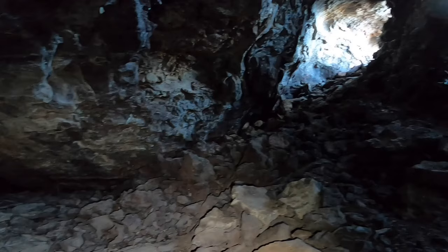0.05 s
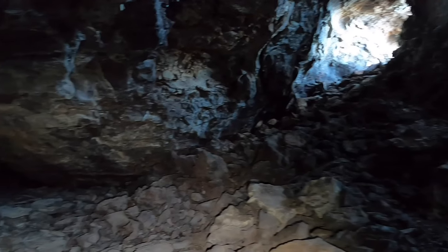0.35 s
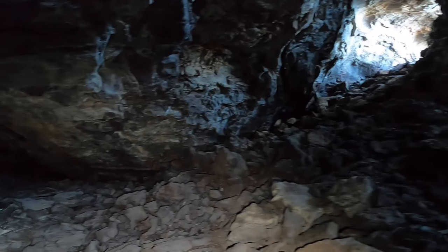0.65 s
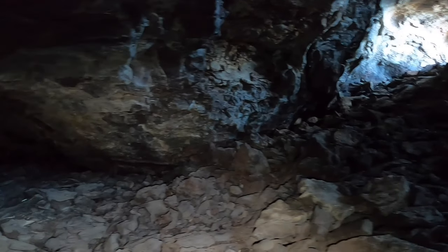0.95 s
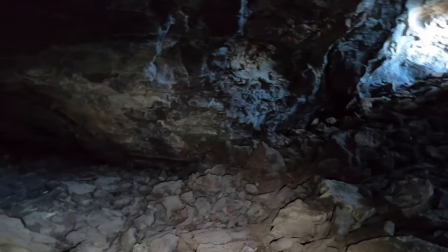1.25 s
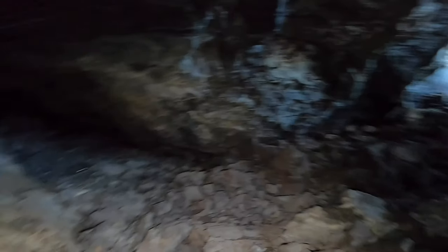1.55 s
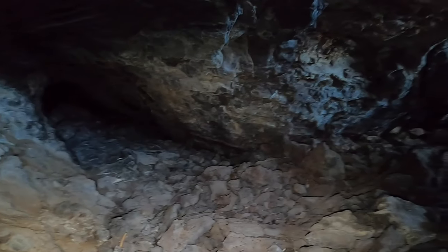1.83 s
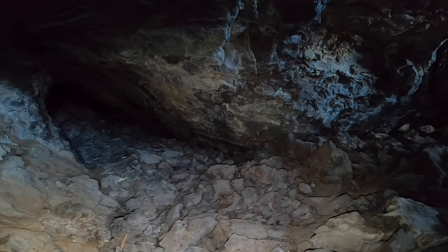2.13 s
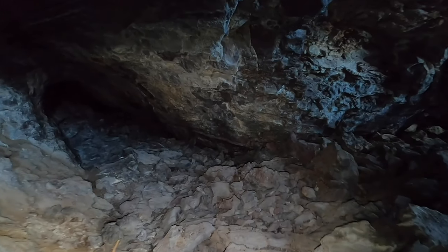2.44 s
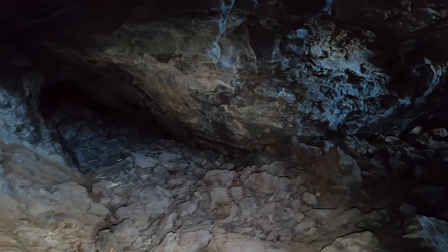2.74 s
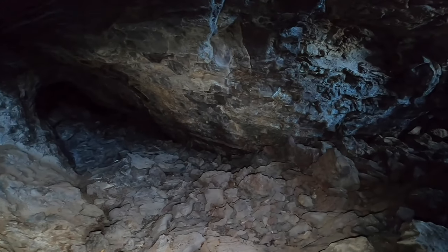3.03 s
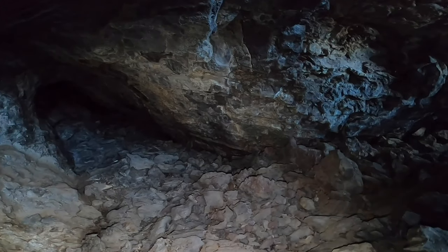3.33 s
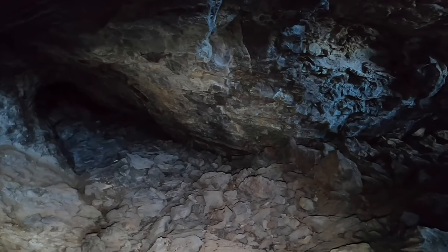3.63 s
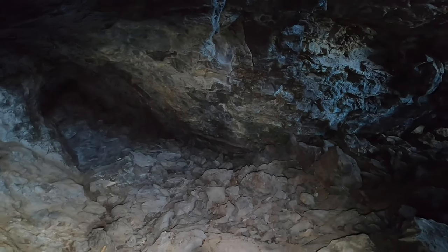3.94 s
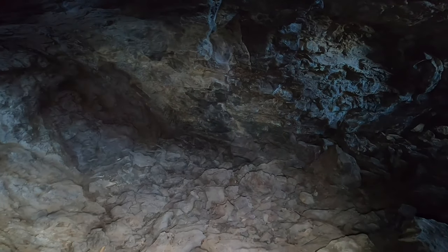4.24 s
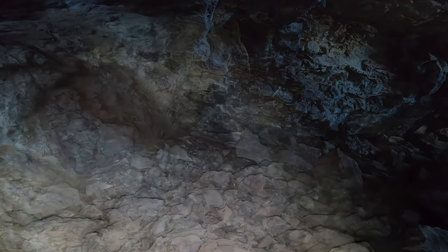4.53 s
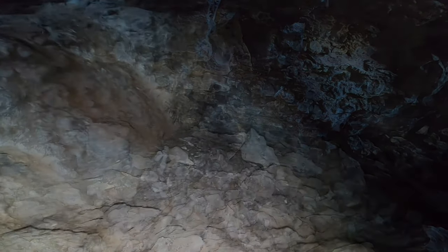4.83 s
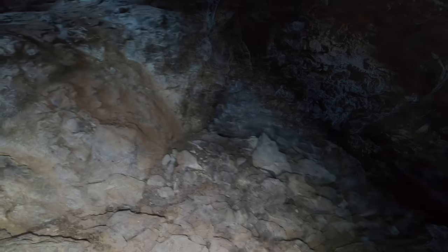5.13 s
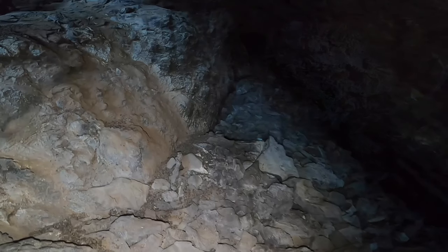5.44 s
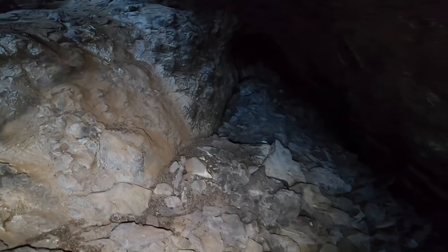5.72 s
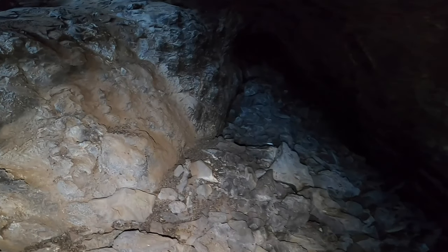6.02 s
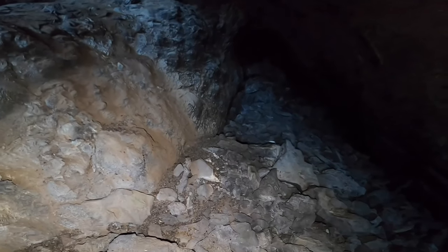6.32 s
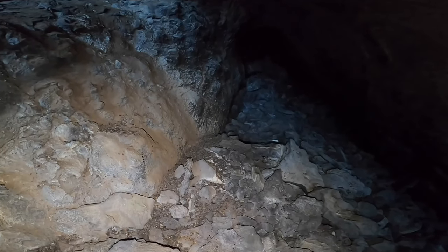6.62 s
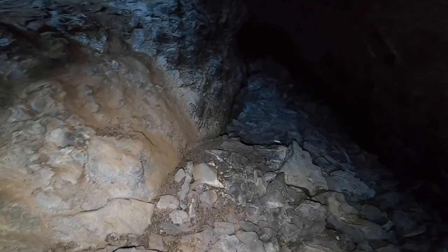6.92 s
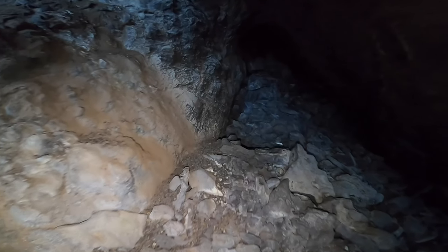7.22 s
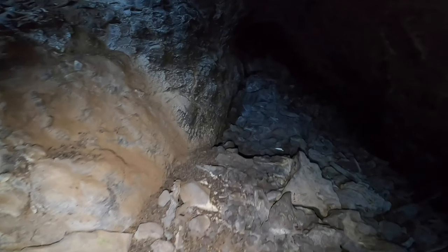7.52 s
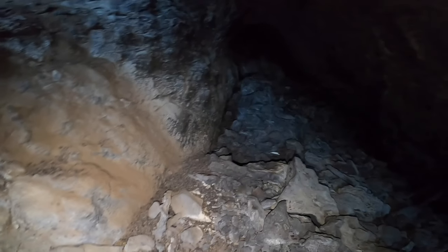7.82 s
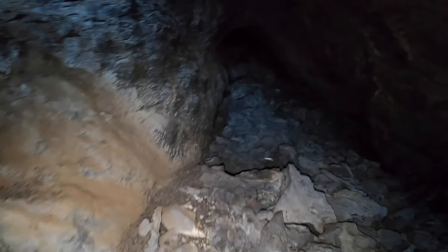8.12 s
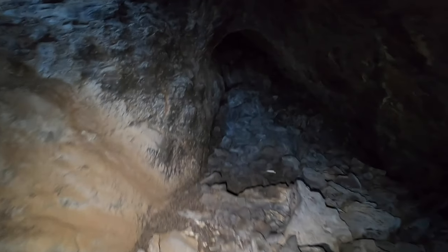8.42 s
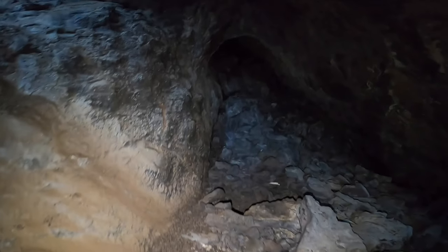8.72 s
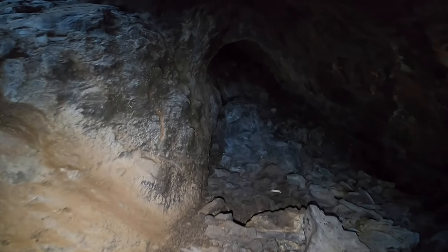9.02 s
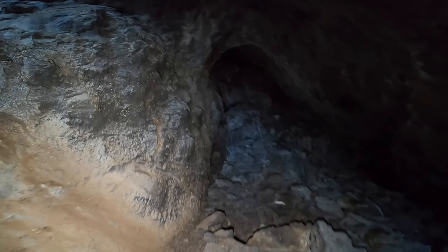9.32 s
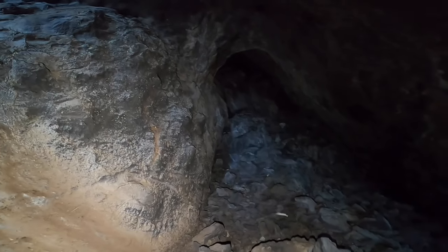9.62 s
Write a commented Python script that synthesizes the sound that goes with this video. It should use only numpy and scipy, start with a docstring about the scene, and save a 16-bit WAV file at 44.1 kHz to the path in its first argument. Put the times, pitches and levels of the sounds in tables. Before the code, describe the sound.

Uneven footsteps crunch over loose rock in a quiet cave, with stones knocking, scraping and clinking over a faint hiss.

```python
"""First comes a low murmur of air with a faint hiss, then footsteps on loose lava rubble in a low tunnel.
Someone is picking a way along. Each step packs the stones with a dull rumble, grinds the grit in
many tiny slips and knocks single stones together. Now and then a sliver of stone clinks,
or something hard drags over the rock and rings. The close rock walls add a short echo."""
import sys
import numpy as np
from scipy import signal
from scipy.fft import rfft, irfft, next_fast_len
from scipy.io import wavfile
from scipy.ndimage import uniform_filter1d, map_coordinates

SR = 44100
rng = np.random.default_rng(int(sys.argv[2]) if len(sys.argv) > 2 else 0)


def put_to_file(sound):
    """Save the sound as 16-bit audio at rate SR, in the file named by the first command-line argument."""
    columns = np.atleast_2d(sound).T  # one column per channel
    safe = np.clip(columns, -1, 1)
    whole_steps = np.round(safe * 32767)
    wavfile.write(sys.argv[1], SR, whole_steps.astype(np.int16))


N = 434826
TIME = np.arange(N) / SR


def from_db(db):
    """Turns decibels into a number to multiply a sound by."""
    return 10 ** (np.asarray(db) / 20)


def rms_one(x):
    """Scales a sound so that its average strength (rms) is 1."""
    return x / np.sqrt(np.mean(x ** 2) + 1e-20)


def at_hz(points, hz):
    """Reads a table between its rows, giving every octave equal room."""
    hz_points, values = np.transpose(points)
    return np.interp(np.log(np.maximum(hz, 1)), np.log(hz_points), values)


def band(x, low_hz, high_hz):
    """Keeps the part of a sound between two frequencies."""
    edges = np.clip([low_hz, high_hz], 10, .47 * SR)
    return signal.sosfilt(signal.butter(2, edges, "band", fs=SR, output="sos"), x + 1e-18)


def resonate(x, hz, width_hz):
    """Makes a sound ring at one pitch; the narrower the width, the longer it rings."""
    r = np.exp(-np.pi * width_hz / SR)
    feedback = [1, -2 * r * np.cos(2 * np.pi * hz / SR), r * r]
    return signal.lfilter(np.array([1, 0, -1]) * (1 - r * r) / 2, feedback, x + 1e-18)


def evened(x, seconds):
    """Holds the strength near 1, leaving only flickers quicker than the given time."""
    size = max(int(seconds * SR), 8)
    power = np.mean(np.atleast_2d(x) ** 2, axis=0)
    power = uniform_filter1d(uniform_filter1d(power, size), size)
    return x / np.sqrt(np.maximum(power, 0) + 1e-6 * power.mean())


def drift(per_s):
    """A smooth random wander of strength 1."""
    turns = rng.standard_normal(int(per_s * TIME[-1]) + 2)
    return rms_one(np.interp(TIME * per_s, np.arange(len(turns)), turns))


def swell(s, hold_s, rise_s, fall_s):
    """Pressure builds up to 1 at time s, is held, and dies away."""
    out = np.zeros(N)
    near = slice(max(int((s - 8 * rise_s) * SR), 0), int((s + hold_s + 8 * fall_s) * SR))
    t = TIME[near] - s
    out[near] = np.exp(np.minimum(t, 0) / rise_s - np.maximum(t - hold_s, 0) / fall_s)
    return out


def slips(per_s, spread_db):
    """Tiny cracks and slips as random clicks: many weak, a few strong."""
    at = np.flatnonzero(rng.random(N) < per_s / SR)
    clicks = np.zeros(N)
    clicks[at] = from_db(spread_db * np.minimum(rng.exponential(1, N)[at], 5))
    return clicks


def add(track, s, sound):
    """Mixes a sound into the track at time s."""
    start = int(round(s * SR))
    track[..., start:start + sound.shape[-1]] += sound[..., :N - start]


# How alike left and right are: (frequency [Hz], likeness [0 to 1])
LIKENESS = [(500, 0.98), (2000, 0.9), (5000, 0.72), (12000, 0.4)]


def stereo(mid, side, hz, diffuse=0):
    """Left and right are less alike for high sounds and for sound from all around (diffuse)."""
    alike = np.clip(at_hz(LIKENESS, hz) * (1 - diffuse), 0, .995)
    return np.sqrt((1 + alike) / 2) * mid + np.sqrt((1 - alike) / 2) * side * np.array([[1], [-1]])


# The tone of the air's murmur and of its hiss: (frequency [Hz], relative level [dB])
MURMUR_TONE = [(25, -8.5), (100, -21.5), (165, -1.5), (250, -2.5), (400, -11), (900, -21), (4000, -55)]
HISS_TONE = [(300, -23.5), (700, -7.5), (1300, 0.5), (3800, -6.5), (7300, -10.5), (12000, -27.5),
             (16000, -36)]
# The slow rise and fall of the hiss: (time [s], level [dB])
HISS_LEVEL = [(0, -72), (1.48, -68), (1.59, -64), (1.72, -73), (2.2, -65.5), (4.35, -70.5), (4.68, -65),
              (5.13, -71), (7.0, -66), (7.15, -60), (7.5, -64.5), (8.78, -68.5), (9.86, -74)]


def air(murmur_db=-67, diffuse=0.67, waver_db=1.1, wavers_per_s=7, rustle_db=2.0):
    """The still tunnel: a wavering low murmur under a thin, slowly changing hiss."""
    hz = np.fft.rfftfreq(N, 1 / SR)
    wavering_db = murmur_db + waver_db * drift(wavers_per_s)
    hiss_db = np.interp(TIME, *np.transpose(HISS_LEVEL)) + rustle_db * drift(wavers_per_s)
    out = 0
    for tone, level_db in (MURMUR_TONE, wavering_db), (HISS_TONE, hiss_db):
        white = rfft(rng.standard_normal((2, N)))
        spectrum = stereo(*white, hz, diffuse) * from_db(at_hz(tone, hz))
        out = out + from_db(level_db) * rms_one(irfft(spectrum, N))
    return out


# How long the tunnel echoes: (frequency [Hz], time to fade by 60 dB [s])
ECHO_FADE = [(100, 0.51), (260, 0.25), (800, 0.1), (8000, 0.18)]


def tunnel(x, echo_db=-12, first_echo_s=0.0033, diffuse=0.26):
    """Close, rough walls send back a short blur of echoes, different on each side."""
    t, edges = np.arange(SR // 2) / SR, np.geomspace(60, 16000, 9)
    tail = 0
    for low, high in zip(edges, edges[1:]):
        hz = np.sqrt(low * high)
        noise = band(stereo(*rng.standard_normal((2, len(t))), hz, diffuse), low, high)
        tail = tail + noise * from_db(-60 * t / at_hz(ECHO_FADE, hz))
    tail = tail * (t > first_echo_s)
    tail = tail / np.sqrt(np.sum(tail ** 2) / 2)
    return x + from_db(echo_db) * signal.fftconvolve(x, tail, axes=1)[:, :N]


# How much louder the left side is: (frequency [Hz], left minus right [dB])
LEFT_LOUDER = [(100, -0.2), (600, 1.5), (1300, 2.5), (2400, 5.5), (4400, 3), (8000, -1), (15000, 1)]
# How far the left wave runs ahead: (frequency [Hz], lead [radians])
LEFT_AHEAD = [(100, 0.077), (1300, -0.26), (2760, -0.45), (5300, 0.25), (7600, 0.93)]


def microphone_openings(x):
    """Sound from the ground reaches the microphone's two openings with unequal level and timing."""
    size = next_fast_len(N + 2000)
    hz = np.fft.rfftfreq(size, 1 / SR)
    left = from_db(at_hz(LEFT_LOUDER, hz) / 2) * np.exp(.5j * at_hz(LEFT_AHEAD, hz))
    return irfft(rfft(x, size) * np.array([left, 1 / left]), size)[:, :N]


# Hard edges dragged over rock. Each row is one edge, with two lists:
# strokes (time [s], hold [s], level [dB]) and tones (pitch [Hz], width [Hz], relative level [dB])
DRAGS = [ ([(2.349, 0.009, -28.5), (2.413, 0.0038, -46)], [(5660, 170, -1), (5867, 34, -6.5),
         (8847, 190, -20)]), ([(2.66, 0.081, -56.5), (2.792, 0.025, -41.5), (2.93, 0.018, -43),
         (2.98, 0.071, -50.5), (3.06, 0.035, -31.5), (3.212, 0.0081, -44.5)], [(2590, 280, 5.5),
         (5910, 180, -2), (8680, 260, -13), (12000, 200, -25)]), ([(5.83, 0.098, -68), (7.3, 0.077, -57.5),
         (7.62, 0.18, -66.5), (7.91, 0.046, -63), (8.17, 0.014, -53.5)], [(4140, 150, 2.5),
         (5228, 96.3, 3.5), (6738, 87, -5), (8720, 160, -7)]), ([(9.25, 0.12, -50)], [(1080, 82, 0.5),
         (2724, 57, 0), (3065, 60, 1), (5600, 97, -12), (6760, 100, -12), (8800, 200, -15.5)])]


def drags(slips_per_s=450, catches_per_s=160, catch_db=3, sag=0.03, wander=0.012, wanders_per_s=60,
          rise_s=0.0042, fall_s=0.0093):
    """An edge sticks and slips, ringing a few tones unevenly; the pitch wanders and sags when pressed."""
    out, clicks = 0, slips(slips_per_s, spread_db=10.5) * rng.choice([-1, 1], N)
    for strokes, tones in DRAGS:
        ringing = 0
        for hz, width_hz, db in tones:
            tone = resonate(resonate(clicks, hz, width_hz), hz, 4 * width_hz)
            catching = from_db(catch_db * drift(catches_per_s))
            ringing = ringing + from_db(db) * rms_one(tone * catching)
        pressure = sum(from_db(db) * swell(s, hold_s, rise_s, fall_s) for s, hold_s, db in strokes)
        speed = 1 + wander * drift(wanders_per_s) - sag * np.tanh(pressure / from_db(-32.5))
        bent = map_coordinates(evened(ringing, 0.013), [np.cumsum(speed)], order=2, mode="mirror")
        out = out + pressure * bent
    return out


# Dense slivers of stone landing: (time [s], level [dB], pitch [Hz])
CLINKS = [(0.482, -40.5, 3300), (0.773, -47, 3270), (0.883, -37.5, 3214), (2.567, -45, 7100),
          (4.59, -42, 5280), (5.788, -35, 3967), (6.86, -49, 984), (7.289, -29.5, 1845),
          (8.306, -35.5, 7200), (8.389, -37, 5187), (9.017, -48.5, 7090), (9.055, -42.5, 5210),
          (9.156, -41, 7150)]
# A sliver's higher tones: (multiple of its pitch [ratio], relative level [dB])
SLIVER_TONES = [(1.19, -15), (1.71, -14.5), (2.34, -14.5)]


def clinks(cycles=22, contact_s=0.0013, contact_db=-3, bounce_s=0.0078, bounce_db=-6):
    """A sliver lands with a gritty tick, bounces once and rings briefly; high tones die first."""
    out, t = np.zeros((2, N)), np.arange(SR // 12) / SR
    for s, db, hz in CLINKS:
        tones = [(hz, 0)] + [(hz * ratio, level) for ratio, level in SLIVER_TONES if hz * ratio < SR / 5]
        for delay_s, loss_db in (0, 0), (bounce_s, bounce_db):
            noise = stereo(*rng.standard_normal((2, len(t))), hz)
            tick = band(noise, hz / 2, hz * np.sqrt(2)) * np.exp(-t / contact_s)
            ring = 0
            for tone_hz, tone_db in tones:
                strength = from_db(tone_db + 2 * rng.standard_normal())
                ring = ring + strength * np.sin(2 * np.pi * tone_hz * t) * np.exp(-t * tone_hz / cycles)
            add(out, s + delay_s, from_db(db + loss_db) * (ring + from_db(contact_db) * tick))
    return out


# The sole coming down: (time [s], relative boom level [dB], relative deep level [dB], slab pitch [Hz])
THUDS = [(0.5, -41, -65.5, 205), (0.824, -33, -43.5, 195), (2.335, -33.5, -56, 128),
         (3.097, -39, -56.5, 215), (3.452, -32, -57, 159), (3.57, -34.5, -70, 169),
         (4.783, -33, -53.5, 259.8), (6.462, -30, -68, 177), (6.529, -31, -55, 232),
         (6.743, -33, -52, 194.3), (7.281, -33, -48.5, 294), (7.327, -42, -50, 170.4),
         (8.062, -39.5, -71, 210.6), (8.103, -36.5, -61, 199.5), (8.621, -33, -53.5, 182),
         (9.656, -43.5, -79, 196)]


def thuds(rise_s=0.0037, fall_s=0.011, boom_s=0.012):
    """The soft sole pushes packed rubble: a slab booms, and under full weight the ground swings deeper."""
    out, t = np.zeros(N), np.arange(SR // 5) / SR
    rise = 1 - np.exp(-t / rise_s)
    for s, boom_db, deep_db, hz in THUDS:
        push = rise * np.exp(-t / fall_s) * rng.standard_normal(len(t))
        bump = band(push, hz, 2 * hz)
        boom = rise * np.exp(-t / boom_s) * np.sin(2 * np.pi * hz * t)
        slab = boom / boom.max() + bump / np.abs(bump).max()
        ground = rms_one(band(push, 53, 134))
        add(out, s, from_db(boom_db - 3) * slab + from_db(deep_db - 7) * ground)
    return out


# Single stones knocking: (time [s], relative clack level [dB], relative tick level [dB], pitch [Hz])
KNOCKS = [(0.481, -41, -58, 1280), (0.605, -47.5, -52, 2200), (0.628, -52, -49.5, 2420),
          (0.701, -43.5, -52.5, 2680), (0.825, -42, -42.5, 985), (1.202, -51, -80, 1095),
          (2.347, -27.5, -40, 1750), (2.407, -33.5, -48, 1986), (2.573, -45, -45.5, 2900),
          (2.792, -41.5, -34, 5900), (2.815, -34, -43.5, 1710), (2.826, -39.5, -50, 1750),
          (2.899, -50.5, -47, 5400), (2.918, -38.5, -40.5, 2900), (3.088, -23, -41, 1580),
          (3.196, -42, -54, 2640), (3.214, -32.5, -52, 1617), (3.425, -42.5, -50.5, 1780),
          (3.547, -38, -47, 1820), (4.067, -47.5, -69, 1599), (4.119, -47.5, -77, 1315),
          (4.336, -54, -62, 2840), (4.549, -43.5, -57, 1580), (4.588, -35.5, -51, 1109),
          (4.764, -45, -34.5, 3755), (4.844, -35.5, -42, 3150), (4.881, -54, -65, 1478),
          (4.934, -45.5, -65, 1880), (5.035, -51, -77, 1284), (5.789, -41, -44, 3770),
          (5.846, -39.5, -52, 1597), (6.149, -34, -48.5, 1582), (6.166, -37.5, -50, 1550),
          (6.185, -41, -50.5, 1440), (6.219, -42.5, -51.5, 2900), (6.372, -46, -57, 2154),
          (6.402, -39.5, -50, 2406), (6.444, -23, -48, 1145), (6.452, -25.5, -46, 1370),
          (6.474, -36, -42.5, 912), (6.492, -33, -39, 3060), (6.643, -41, -60, 1670),
          (6.705, -36.5, -55.5, 1300), (6.737, -29.5, -48.5, 1640), (6.744, -22.5, -42.5, 1800),
          (7.219, -39, -49, 3290), (7.24, -32.5, -61, 1064), (7.287, -30.5, -69, 1202),
          (7.328, -31.5, -63, 1780), (7.488, -56, -61, 4500), (8.292, -38.5, -63, 1290),
          (8.306, -40.5, -48, 1640), (8.536, -43.5, -53, 1630), (8.608, -50, -47, 5310),
          (8.621, -43.5, -81, 1740), (8.843, -56, -72, 1560), (9.125, -35.5, -51, 1210),
          (9.208, -54, -52.5, 5032), (9.221, -54, -47, 5076), (9.245, -35.5, -57, 1200),
          (9.302, -47, -49, 2900), (9.367, -39, -74, 1056), (9.428, -55, -58, 5140),
          (9.563, -53, -62.5, 3898)]


def knocks(contact_s=0.0026, rattle_s=0.025, rattle_db=-19, sharpness=8, ring_db=12, body_db=-8):
    """A sharp hit rattles the stones nearby; the struck stone, full of holes, rings only briefly."""
    out, t = np.zeros((2, N)), np.arange(SR // 20) / SR
    fade = np.exp(-t / contact_s) + from_db(rattle_db) * np.exp(-t / rattle_s)
    ranges_hz = [(330, 700), (950, 2180), (3500, 7250)]   # body, clack, tick
    for s, clack_db, tick_db, stone_hz in KNOCKS:
        hit = fade * stereo(*rng.standard_normal((2, len(t))), stone_hz)
        hit = hit + from_db(ring_db) * resonate(hit, stone_hz, stone_hz / sharpness)
        big_db = body_db - 10 * np.log10(stone_hz / 2000)   # big, low-pitched stones have more body
        for level_db, (low, high) in zip((clack_db + big_db, clack_db, tick_db), ranges_hz):
            part = band(band(hit, low, high), low / 2, 2 * high)
            add(out, s, from_db(level_db - 11.5) * rms_one(part))
    return out


# A foot bearing down: (time [s], hold [s], heavy stones [dB], gravel [dB], fine grit [dB])
PRESSES = [(0.489, 0.0058, -48.5, -49, -66), (0.779, 0.14, -48.5, -49, -60), (0.826, 0.0099, -34, -44, -49),
           (2.305, 0.021, -41.5, -38, -45.5), (2.342, 0.02, -37, -33.5, -60),
           (2.575, 0.0044, -45.5, -50, -56.5), (2.784, 0.022, -51, -42.5, -46.5),
           (3.031, 0.019, -55, -42.5, -50), (3.062, 0.047, -36.5, -31, -43.5),
           (3.217, 0.0088, -48, -43.5, -61.5), (3.434, 0.045, -49.5, -53.5, -66),
           (3.565, 0.019, -45, -47, -63), (4.164, 0.013, -44, -48.5, -77), (4.76, 0.021, -38.5, -35, -41),
           (4.845, 0.051, -49.5, -50, -63.5), (5.569, 0.042, -53, -55, -65),
           (6.054, 0.027, -51.5, -54, -62), (6.15, 0.07, -50, -48.5, -51),
           (6.447, 0.0097, -39.5, -35.5, -45), (6.528, 0.019, -45.5, -44.5, -48),
           (6.643, 0.027, -45.5, -48.5, -54.5), (6.855, 0.034, -48.5, -58.5, -71),
           (7.291, 0.0083, -30.5, -41, -66), (7.33, 0.0057, -35, -41, -53), (8.065, 0.014, -46, -53, -52.5),
           (8.29, 0.015, -39, -46, -50.5), (8.351, 0.018, -53.5, -52.5, -51.5),
           (8.621, 0.0072, -47, -50, -80), (9.126, 0.0058, -42, -47.5, -51),
           (9.249, 0.13, -47.5, -58.5, -65)]
# The sole rubbing lightly as it seeks a hold: (time [s], length [s], gravel [dB], sandiness [dB])
SHUFFLES = [(0.459, 0.22, -62.5, 0), (1.14, 0.048, -65.5, -2.5), (2.40, 0.062, -55.5, -1.5),
            (2.65, 0.42, -62, 1), (3.261, 0.45, -62, 2), (3.698, 0.15, -61, -4.5), (4.038, 0.16, -65.5, -4),
            (4.898, 0.1, -59, -1.5), (5.526, 0.22, -64, 1), (5.793, .16, -56.5, 1),
            (6.228, .1, -53.5, -1.5), (6.681, .2, -60.5, -3.5), (7.63, 0.19, -65.5, -5),
            (8.38, 0.065, -59.5, 0.5), (8.539, 0.072, -58.5, -0.5), (9.097, 0.15, -61, -4)]


def tread(press_rise_s=0.009, settle_db=-21):
    """How strongly the feet stir the heavy stones, the gravel and the grit: three loudness curves."""
    power = np.zeros((3, N))
    lags_s, falls_s = (0.0015, 0, 0), (0.013, 0.013, 0.0063)   # heavy stones move and stop later
    for s, hold_s, *levels_db in PRESSES:
        # loose stones creep before a press and settle after it
        settling = from_db(settle_db) * swell(s, hold_s, rise_s=0.018, fall_s=0.055)
        for k, level_db in enumerate(levels_db):
            press = swell(s + lags_s[k], hold_s, press_rise_s, falls_s[k])
            power[k] += from_db(level_db) ** 2 * (press ** 2 + settling ** 2)
    for s, length_s, gravel_db, sandy_db in SHUFFLES:
        mix_db = np.array([-2 - sandy_db, 0, -5 + sandy_db])   # sandier: fewer heavy stones, more grit
        rub = swell(s, length_s, rise_s=0.024, fall_s=0.022)
        power += np.outer(from_db(gravel_db + mix_db), rub) ** 2
    return np.sqrt(power)


def chips(gravel, grit, per_s=170, cycles=19, level_db=-1, spread_db=3, snap_db=-57):
    """Small brittle chips snap underfoot, each ringing briefly at a pitch of its own."""
    out, t = np.zeros((2, N)), np.arange(SR // 25) / SR
    for when, pitch, strength, pan in rng.random((int(per_s * N / SR), 4)):
        at = int(when * N)
        hz = 1000 * 6 ** pitch
        push = gravel[at] ** (1 - pitch) * grit[at] ** pitch   # small, high chips follow the grit
        push = push * min(1, gravel[at] / from_db(snap_db))   # light pressure breaks hardly anything
        ring = np.sin(2 * np.pi * hz * t) * np.exp(-t * np.sqrt(hz * 1200) * np.pi / cycles)
        sides_db = level_db + spread_db * (2 * strength + pan * np.array([[1], [-1]]))
        add(out, at / SR, push * from_db(sides_db) * ring)
    return out


# The tone of the grinding rubble: (frequency [Hz], relative level [dB])
RUBBLE_TONE = [(65, -17), (100, -21.5), (170, -1.5), (410, -3.5), (650, -13.5), (1000, 7), (1650, 6),
               (2200, -9), (2700, 3), (3500, -16.5), (5700, -21), (8000, -28), (14000, -49)]


def grinding(clicks, low_hz, high_hz, count, sharpness, rub_db, even_s,
             spread_db=8, chatter_s=0.0037, coarser_db=3):
    """Each slip chatters briefly and rings some stone sizes more than others, over smooth rubbing."""
    out, at = 0, np.flatnonzero(clicks)
    noise = rng.standard_normal((2, N))
    fade = np.exp(-2 / (chatter_s * SR))
    for k, hz in enumerate(np.geomspace(low_hz, high_hz, count)):
        share = from_db(spread_db * np.clip(rng.standard_normal(len(at)), -2, 2))
        energy = np.zeros(N)
        energy[at] = (clicks[at] * share) ** 2
        chatter = signal.lfilter([1], [1, -fade], energy + 1e-18)
        own_noise = stereo(*np.roll(noise, k * SR // count, axis=1), hz)
        push = np.sqrt(chatter / chatter.mean() + from_db(rub_db) ** 2) * own_noise
        width_hz = hz / sharpness
        ring = resonate(resonate(push, hz, width_hz), hz, 2 * width_hz)
        # the rubble grows coarser and duller along the way
        tilt_db = coarser_db * (.5 - TIME / TIME[-1]) * np.log2(hz / low_hz)
        out = out + from_db(at_hz(RUBBLE_TONE, hz) + tilt_db) * ring
    return evened(out, even_s)


def crunch(heavy, gravel, grit):
    """More weight makes more slips a second; heavy stones, gravel and grit move together."""
    load = np.clip(gravel / from_db(-45), .05, 4) ** 0.51
    clicks = slips(560 * load, spread_db=4.5) * np.minimum(3.7 * load, 1)
    stones = heavy * grinding(clicks, 82.5, 674, count=9, sharpness=3.44, rub_db=-11.5, even_s=0.021)
    pebbles = gravel * grinding(clicks, 781, 3255, count=11, sharpness=6.0, rub_db=-13.5, even_s=0.032)
    sand = grit * grinding(clicks, 3430, 14100, count=10, sharpness=4.0, rub_db=-12.5, even_s=0.047)
    return stones + pebbles + sand


def scene():
    """The feet stir the rubble and the tunnel echoes, over the murmur and hiss of the air."""
    heavy, gravel, grit = tread()
    dragging = drags() * from_db([[-2.5], [2.5]])   # turned down on the left, up on the right
    feet = crunch(heavy, gravel, grit) + chips(gravel, grit) + knocks() + clinks() + thuds() + dragging
    return microphone_openings(tunnel(feet)) + air()


def record(dry, cutoff_hz=15800):
    """Cuts away the very highest sounds."""
    return signal.sosfilt(signal.ellip(10, .1, 70, cutoff_hz, fs=SR, output="sos"), dry)


dry = scene()
out = record(dry)
put_to_file(out)
```